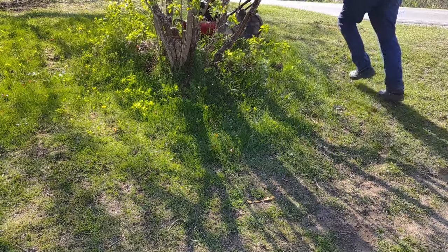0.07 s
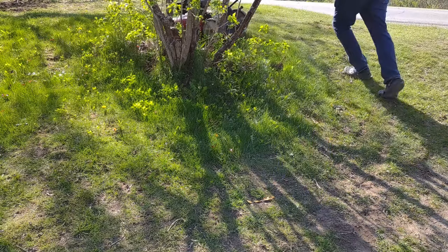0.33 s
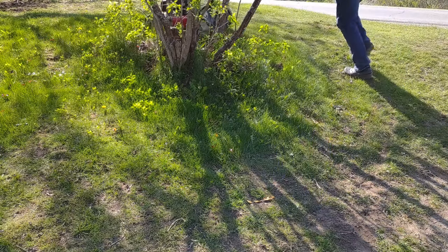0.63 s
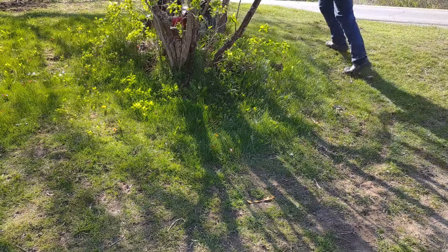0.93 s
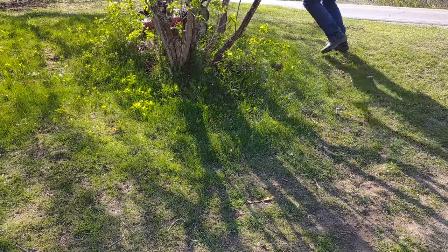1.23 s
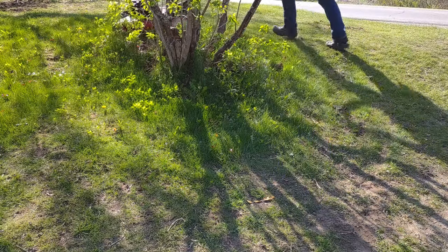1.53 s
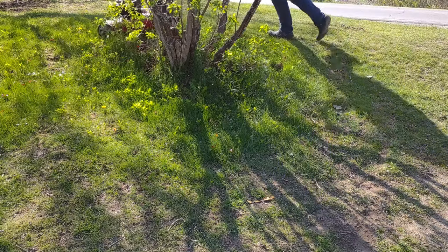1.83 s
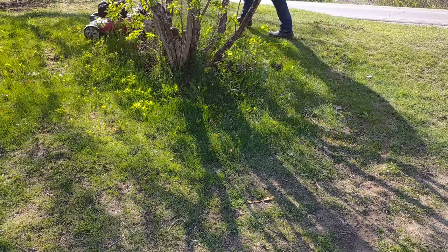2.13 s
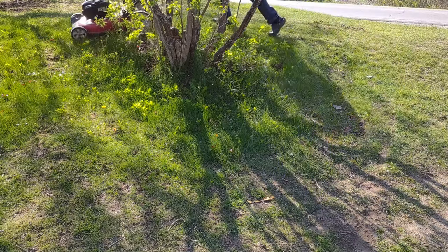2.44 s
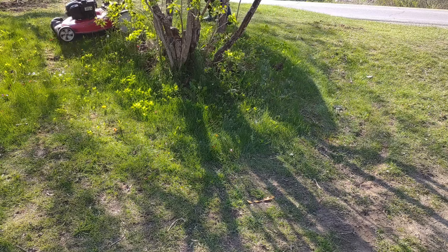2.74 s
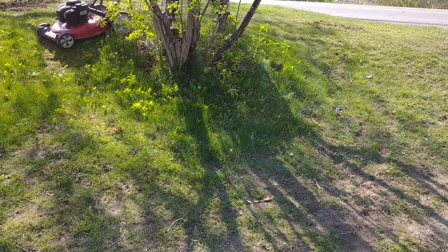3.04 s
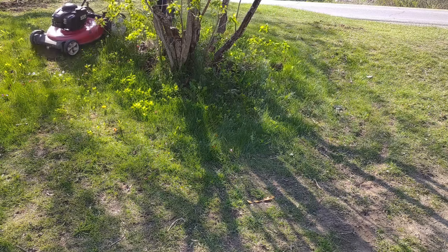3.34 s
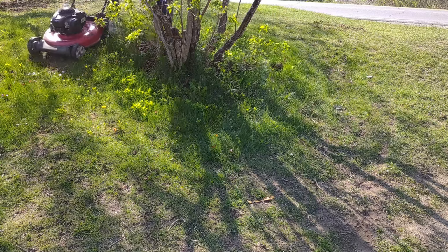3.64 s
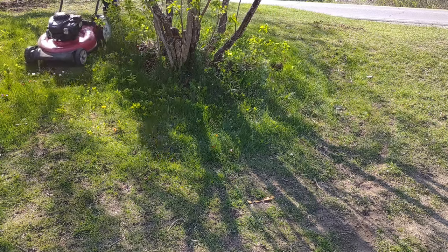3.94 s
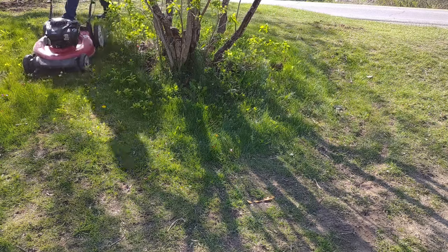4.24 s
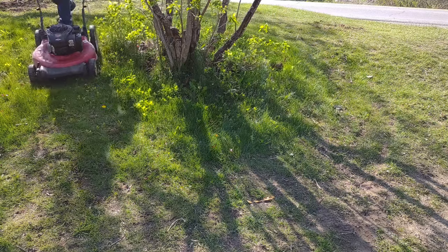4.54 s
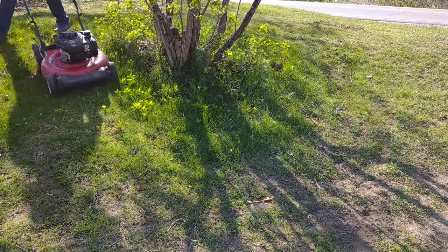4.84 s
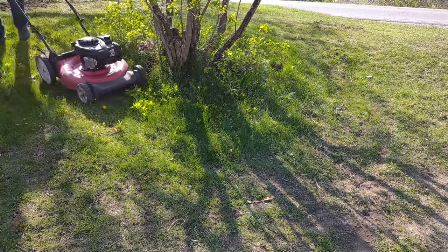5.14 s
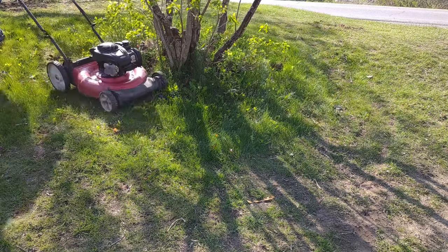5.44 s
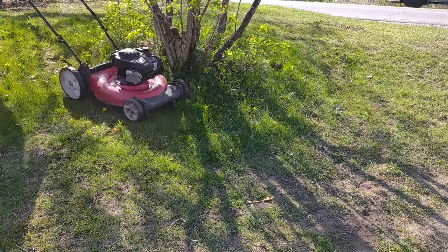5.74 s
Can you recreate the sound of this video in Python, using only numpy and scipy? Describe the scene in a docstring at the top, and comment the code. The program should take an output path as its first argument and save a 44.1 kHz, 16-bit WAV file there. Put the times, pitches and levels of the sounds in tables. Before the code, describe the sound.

A small petrol push mower runs without a break for about six seconds on a lawn, heard from a fixed spot a few metres away. Its pitch stays even: a low blade hum over a rapid, throbbing exhaust. For the first two seconds it is behind a bush and sounds muffled, moving from near the centre to slightly left. Faint ticks of twigs come around 1.7 to 2 seconds. From about 2.5 seconds the mower comes round the bush and gradually brightens, with sharper exhaust pops, light valve clatter and the hiss of cut grass. Small, brief twig crackles are scattered between 2.7 and 4.1 seconds. Around 4 seconds the deep hum thins, and by 5 seconds the mower faces the listener with a fuller, buzzing rush of air. A quick cluster of twig snaps comes near 5.3 seconds. A very faint, low outdoor background lies underneath.

```python
"""A muffled, pulsing drone comes from behind a bush: a four-stroke petrol mower, pushed over a lawn.
It brightens as it comes round the bush and turns its open side to the listener. The two-tipped blade
hums and churns the air under the deck, the exhaust pops once in two turns, valves clatter, and grass
and twigs crackle in the blade. Distance, the bush, its trunk and the turn set how much of each sound
arrives; interference with the ground echo colours the hiss."""
import sys
import numpy as np
from scipy import signal
from scipy.fft import rfft, irfft
from scipy.io import wavfile
from scipy.ndimage import map_coordinates

SR = 44100
rng = np.random.default_rng(int(sys.argv[2]) if len(sys.argv) > 2 else 0)


def pcm_store(signal):
    """Save signal as 16-bit PCM."""
    levels = np.round(np.clip(np.atleast_2d(signal), -1, 1) * 32767)
    wavfile.write(sys.argv[1], SR, levels.astype(np.int16).T)


N = 254898
TIME = np.arange(N) / SR
# the walk round the bush: time_s, distance_m, hidden_fraction
WALK_ROUND_BUSH = [(0, 4.2, 0.72), (.5, 5.4, 0.85), (1.6, 6.33, 0.9), (2.5, 5.2, 0.68), (2.75, 3.8, 0.57),
                   (3.25, 4.1, 0.32), (3.9, 4.06, 0.14), (4.8, 3.98, 0), (5.78, 3.57, 0.07)]


def gain_of(db):
    """Decibels to amplitude: 20 dB is a factor of ten."""
    return 10 ** (np.asarray(db) / 20)


def unit_rms(x):
    """Normalisation to unit mean power."""
    return x / np.sqrt(np.mean(x ** 2) + 1e-20)


def follow(table):
    """Linear interpolation of each column over time, sample by sample."""
    time_s, *columns = np.transpose(table)
    return [np.interp(TIME, time_s, column) for column in columns]


def colour(x, spectrum):
    """Minimum-phase filtering to a given spectral shape; the result has unit rms."""
    hz, db = np.transpose(spectrum)
    bins = abs(np.fft.fftfreq(8192, 1 / SR))
    log_gain = np.log(gain_of(np.interp(np.log(bins + 1), np.log(hz), db)))
    response = np.exp(np.conj(signal.hilbert(log_gain)))
    taps = np.fft.ifft(response).real[:len(bins) // 2]
    return unit_rms(signal.oaconvolve(np.atleast_2d(x), taps[None], axes=1)[:, :N])


def wander(hz):
    """Random fluctuation of unit rms, band-limited to about hz."""
    bins = np.fft.rfftfreq(2 ** 18, 1 / SR)
    white = rfft(rng.standard_normal(2 ** 18))
    return unit_rms(irfft(white * np.exp(-(bins / hz) ** 2))[:N])


def air(apart):
    """Partial coherence: white noise whose two channels differ more as apart rises to 1."""
    common, side = rng.standard_normal((2, N))
    return unit_rms(np.array([common + apart * side, common - apart * side]))


def delayed(x, samples):
    """Propagation delay along a path of changing length."""
    return map_coordinates(x, [np.arange(N) - samples], order=5, mode="mirror")


def heard(db, bush_db=0, trunk_db=0, turned_db=0):
    """Spherical spreading from level db at 4 m, less bush and trunk losses, plus the turn's gain."""
    metres, hidden = follow(WALK_ROUND_BUSH)
    trunk_s, trunk_half_s, turn_s, turn_half_s = 0.73, 0.72, 4.74, 0.37
    behind_trunk = np.exp(-((TIME - trunk_s) / trunk_half_s) ** 2)
    turned = .5 + .5 * np.tanh((TIME - turn_s) / turn_half_s)
    return 4 / metres * gain_of(db - bush_db * hidden - trunk_db * behind_trunk + turned_db * turned)


def engine_cycles(start=-.24):
    """Phase is the integral of the firing rate; the exhaust opens at each whole number."""
    # the governor hunts a little as the load changes: time_s, firing_rate_hz
    speed = [(0.0, 28.437), (0.2, 27.856), (0.89, 28.868), (1.1, 28.049), (1.45, 28.123), (1.78, 28.621),
             (2.45, 28.426), (2.78, 29.107), (2.99, 28.688), (3.9, 28.705), (4.01, 29.063), (4.82, 28.797),
             (5.26, 28.805), (5.78, 28.632)]
    return start + np.cumsum(follow(speed)[0]) / SR


def blade_angle(cycles, lag=0.0695):
    """Blade-pass phase: two tips and two turns make four passes a cycle."""
    return 2 * np.pi * 4 * (cycles - lag)


def firings(cycles):
    """Impulse train: a unit click each time the exhaust valve opens."""
    return 1. * (np.diff(np.floor(cycles), prepend=np.floor(cycles[0])) > 0)


def firing_harmonics(cycles, table, waver_db=1.6, slip_rad=0.089):
    """Periodic firing gives a harmonic series, each partial a little unsteady in level and phase."""
    out = np.zeros(N)
    for harmonic, db in table:
        angle = 2 * np.pi * round(harmonic) * cycles + slip_rad * wander(3.9)
        out += gain_of(db + waver_db * wander(28)) * np.cos(angle)
    return np.sqrt(2) * out


def lawn_ambience(level_db=-49):
    """Stationary noise: a faint, low outdoor background."""
    # background spectrum: frequency_hz, relative_db
    spectrum = [(20, 5), (45, -13.5), (90, -20), (200, 7), (500, -9), (2000, -27), (16000, -66)]
    return gain_of(level_db) * colour(air(0.09), spectrum)


def twigs(level_db=-3.0, splinter_db=4, width_hz=3500, broadband=0.08):
    """Brittle fracture: each twig splinters in a bright noise burst that decays exponentially."""
    # twigs and stalks hit by the blade: start_s, relative_db, t60_s, pitch_hz
    strikes = [(.075, -46, 0.018, 7500), (1.718, -31, 0.016, 8400), (1.983, -35, 0.026, 7800),
               (2.009, -29.5, 0.033, 8000), (2.027, -32, .02, 9000), (2.651, -30, 0.1, 7540),
               (2.744, -27.5, 0.068, 6500), (2.97, -20.5, 0.023, 9900), (3.016, -27, 0.033, 12500),
               (3.407, -24, 0.039, 6000), (3.718, -22, .03, 6000), (4.1, -28, 0.031, 8000),
               (5.274, -19, 0.016, 9500), (5.282, -20, .03, 7700), (5.345, -24, 0.027, 8000),
               (5.353, -17, 0.069, 7450), (5.381, -20, 0.015, 7860)]
    # splintering spectrum: frequency_hz, relative_db
    spectrum = [(800, -6), (3000, -2), (5500, -5.5), (7500, -2), (10500, -3), (13000, -5), (16000, 0)]
    splinters = colour(air(0.55) * gain_of(splinter_db * wander(630)), spectrum)
    out = np.zeros((2, N))
    for start_s, db, t60_s, hz in strikes:
        start = round(start_s * SR)
        burst = splinters[:, start:start + SR // 10]
        length = burst.shape[1]
        ring = unit_rms(signal.lfilter(*signal.iirpeak(hz, hz / width_hz, SR), burst))
        decay = gain_of(level_db + db - 60 * TIME[:length] / t60_s)
        out[:, start:start + length] += decay * unit_rms(ring + broadband * burst)
    return out


def grass(cycles, snaps_per_s=1500, spread_db=4, fizz=1.27, surge_db=1.5, patchy_db=1.46):
    """Shot noise: countless stalks snap and clippings strike the deck, in clumps."""
    # cutting spectrum: frequency_hz, relative_db
    spectrum = [(1500, -18), (4000, -29.5), (5500, -13), (6100, -3.5), (8000, -4), (10400, -5),
                (11100, -8.5), (15500, -13)]
    # thick tufts that the blade bites into: centre_s, half_length_s, boost_db
    tufts = [(.22, 0.085, 3.5), (1.295, 0.3, 3.5), (1.755, 0.099, 6), (1.992, 0.067, 7.5), (2.683, .08, 0),
             (4.1, 0.14, 3), (5.72, 0.19, 3.5)]
    sizes = gain_of(spread_db * np.minimum(rng.exponential(1, N), 3.5))
    snaps = sizes * (rng.random(N) < snaps_per_s / SR) * np.sign(rng.standard_normal(N))
    snaps = snaps * (1 + .5 * rng.standard_normal((2, N)))  # unequal left and right
    cutting = unit_rms(snaps) + fizz * air(1.0)
    clumps = gain_of(surge_db * np.cos(2 * np.pi * (cycles + 0.17)) + patchy_db * wander(70))
    swell = gain_of(sum(db * np.exp(-((TIME - s) / half) ** 2) for s, half, db in tufts))
    gain = heard(db=-39, bush_db=5, trunk_db=19, turned_db=2.5)
    return gain * swell * colour(cutting * clumps, spectrum)


def valve_clatter(cycles, uneven_db=4.0, dull_db_per_octave=7):
    """Impact excitation: valves and piston knock, and the casing rings in its modes."""
    # knocks after each exhaust pop: start_cycles, decay_cycles, relative_db
    knocks = [(.78, 0.15, -6), (.92, 0.016, 3), (0.3, 0.36, -7), (0, 0.019, -10)]
    # modes of the engine casing: pitch_hz, bandwidth_hz, relative_db
    modes = [(2600, 260, 1), (4006, 120, 9), (5400, 200, 8), (5980, 95, 11.5), (7040, 170, -6),
             (7650, 110, 9), (10900, 220, -10)]
    impacts = sum(gain_of(db) * np.exp(-((cycles - at) % 1) / decay) for at, decay, db in knocks)
    rattle = unit_rms(impacts * gain_of(uneven_db * wander(40)) * air(0.32))
    tilt = dull_db_per_octave * follow(WALK_ROUND_BUSH)[1]  # low modes pass the leaves best
    ring = np.zeros((2, N))
    for hz, width_hz, db in modes:
        mode = signal.lfilter(*signal.iirpeak(hz, hz / width_hz, SR), rattle)
        ring += gain_of(db - tilt * np.log2(hz / 6000)) * mode
    return (unit_rms(ring) * heard(db=-40, bush_db=11.5, trunk_db=10.5, turned_db=-0.2)
            + rattle * heard(db=-52, bush_db=19, trunk_db=15))


def tip_hiss(cycles, surge_db=1.5, chop_db=1.0):
    """Aerodynamic noise: air hisses off the blade tips, modulated by engine cycle and blade pass."""
    # hiss spectrum: frequency_hz, relative_db
    spectrum = [(800, -19), (2500, -7), (3400, 5), (4300, 3.5), (5200, 2), (6200, -1), (7600, -0.5),
                (9000, -7.5), (16000, -41)]
    surge = surge_db * np.cos(2 * np.pi * (cycles + 0.083))
    pulse = gain_of(surge - chop_db * np.cos(blade_angle(cycles)))
    return colour(pulse * air(0.41), spectrum) * heard(db=-35.5, bush_db=11, trunk_db=13, turned_db=2)


def deck_judder(cycles, jitter_cycles=.003, t60_s=.6):
    """Impulse response: each firing shakes the steel deck into a dense ring that outlasts the cycle."""
    t = TIME[:SR // 4]
    ring = rng.standard_normal(len(t)) * gain_of(-60 * t / t60_s)
    clicks = firings(cycles + jitter_cycles * wander(18))
    return unit_rms(signal.oaconvolve(clicks, ring)[:N])


def deck_turbulence(cycles, chop_db=1.0, surge_db=0.5, flutter_db=1.04, bend_hz=620):
    """Amplitude modulation: turbulence under the deck swells with each blade pass and power stroke."""
    # roar under the deck: frequency_hz, relative_db
    roar_spectrum = [(30, -17.5), (100, -23.5), (200, -3.5), (350, -6.5), (550, 1), (810, 2), (930, -20.5),
                     (1400, -9.5), (1800, -19), (3000, -31.5), (8000, -93.5)]
    # rush out of the open side: frequency_hz, relative_db
    rush_spectrum = [(60, -24), (250, 9), (600, -3.5), (950, 5.5), (1400, 2), (1900, -2), (2250, -4),
                     (2600, -3.5), (2950, -9.5), (3400, -19.5), (6000, -17), (16000, -51)]
    chop = chop_db * np.cos(blade_angle(cycles))
    pulse = gain_of(chop + surge_db * np.cos(2 * np.pi * cycles) + flutter_db * wander(30))
    judder = deck_judder(cycles)
    roar = colour(pulse * (air(0.32) + .5 * judder), roar_spectrum)
    growl = signal.filtfilt(*signal.butter(4, bend_hz, fs=SR), roar)  # lows diffract round the bush
    rush = colour(pulse * (air(0.38) + .55 * judder), rush_spectrum)
    return (growl * heard(db=-29, bush_db=12, trunk_db=9, turned_db=-4)
            + (roar - growl) * heard(db=-27, bush_db=30.5, trunk_db=-9.5, turned_db=-1)
            + rush * heard(db=-37.5, bush_db=3.5, trunk_db=0.5, turned_db=9.5))


def exhaust_pops(cycles, rise_s=.00036, outlet_hz=165, trap_hz=201, trap_width_hz=30):
    """Pulse radiation: each firing throws a spike out of the muffler, whose chamber traps one band."""
    uneven_db, jitter_cycles = 1.0, .005
    t = np.arange(-SR // 40, SR // 40) / SR
    # a small outlet cannot radiate the lowest sounds, so the spike stands between shallow dips
    low_cut = signal.butter(4, outlet_hz, "high", fs=SR, output="sos")
    spike = signal.sosfiltfilt(low_cut, np.exp(-.5 * (t / rise_s) ** 2))
    clicks = firings(cycles + jitter_cycles * wander(12)) * gain_of(uneven_db * wander(27))
    pops = signal.oaconvolve(clicks, spike / spike.max(), "same")
    trap = signal.iirnotch(trap_hz, trap_hz / trap_width_hz, SR)
    return heard(db=-13.5, bush_db=23, turned_db=-2) * signal.filtfilt(*trap, pops)


def exhaust(cycles, puff_db=2):
    """Periodic forcing: at each firing the muffler pops, drones and puffs gas, and the engine rocks."""
    # gas leaving the muffler: frequency_hz, relative_db
    gas_spectrum = [(25, -26), (80, 10), (145, 7.5), (270, 4), (380, 4.5), (600, -6.5), (1600, -31),
                    (4000, -68)]
    # the muffler's drone: firing_harmonic, relative_db
    drone_partials = [(5, -15), (6, -6.5), (9, -13), (10, -8), (13, -21), (14, -12)]
    # the shaft's shake: firing_harmonic, relative_db
    shake_partials = [(2, -4.5), (3, -0.5)]
    # the engine's steady low throb: firing_harmonic, level_db
    throb_partials = [(5, -39.5), (6, -49)]
    puffs = air(0.092) * gain_of(puff_db * np.cos(2 * np.pi * (cycles - .1)))
    gas = colour(puffs, gas_spectrum) * heard(db=-44, bush_db=-1, turned_db=-2)
    drone = firing_harmonics(cycles, drone_partials) * heard(db=-43, bush_db=5.5, turned_db=-12)
    shake = firing_harmonics(cycles, shake_partials) * heard(db=-47, bush_db=-0.5, turned_db=-4)
    return exhaust_pops(cycles) + gas + drone + shake + firing_harmonics(cycles, throb_partials)


def blade_hum(cycles, waver_rad=1.0, unsteady=0.52):
    """Rotor noise: the blade's periodic pressure wave; uneven grass and eddies make overtones waver."""
    # blade-pass tone and its octave as beamed at the listener: time_s, tone_db, octave_db
    beam = [(0.0, -23, -37.5), (1.01, -22, -37), (1.13, -22, -42), (2.62, -21.5, -40.5), (2.7, -23, -51),
            (2.85, -23, -38), (3.62, -30.5, -28.5), (4.07, -49, -29), (4.68, -35.5, -31), (4.83, -33, -58),
            (4.88, -31.5, -45), (5.22, -27.5, -41.5), (5.44, -28, -31.5), (5.78, -27.5, -34)]
    # low overtones: blade_pass_harmonic, relative_db
    buzz_partials = [(3, 1), (4, 1.5), (5, -4.5)]
    # high overtones: blade_pass_harmonic, relative_db
    whine_partials = [(6, -1.5), (7, -20), (8, -14), (12, -15)]
    tone_db, octave_db = follow(beam)
    angle = blade_angle(cycles)
    out = gain_of(tone_db + 0.36) * np.cos(angle)
    out += gain_of(octave_db + 0.5) * np.cos(2 * angle + waver_rad * wander(2.4))
    out *= np.sqrt(2)  # rms to peak
    buzz = heard(db=-41.5, bush_db=3, trunk_db=10, turned_db=6)
    whine = heard(db=-45, bush_db=0.5, trunk_db=0.5, turned_db=6.5)
    for gain, partials in (buzz, buzz_partials), (whine, whine_partials):
        for harmonic, db in partials:
            phasor = np.exp(2j * np.pi * rng.random())
            drift = unsteady * (wander(3.9) + 1j * wander(2.8)) / np.sqrt(2)
            overtone = ((phasor + drift) * np.exp(1j * round(harmonic) * angle)).real
            out += gain * gain_of(db) * unit_rms(overtone)
    return out


def ground_echo(direct, notch_hz, strength, turf_hz=11000):
    """Comb filtering: the direct sound interferes with its reflection, whose top the turf absorbs."""
    bounce = np.array([delayed(side, SR / (2 * notch_hz)) for side in direct])
    bounce = signal.filtfilt(*signal.butter(2, turf_hz, fs=SR), bounce)
    return (direct + strength * bounce) / np.sqrt(1 + strength ** 2)


def from_the_left(pair, lead_samples, shadow=0.39, shadow_hz=7000):
    """Time and level differences: the near side hears first and brighter, the far side is shadowed."""
    left, right = pair
    highs = signal.filtfilt(*signal.butter(2, shadow_hz, "high", fs=SR), pair)
    shade = shadow * lead_samples / lead_samples.max() / 2
    return np.array([left + shade * highs[0], delayed(right - shade * highs[1], lead_samples)])


def scene():
    """Superposition: the mower's sources add, arrive from the left and join the background."""
    # path to the listener: time_s, first_notch_hz, echo_ratio, left_lead_samples
    path = [(0, 4770, 0.13, 0.73), (.7, 4860, 0.56, 2.3), (1.3, 4840, 0.47, 3.9), (2, 4000, 0.64, 5.5),
            (2.5, 3480, 0.57, 6.4), (2.9, 2730, 0.32, 7.5), (4, 2620, 0.23, 8.36), (4.7, 2750, .18, 7.56),
            (5.2, 2970, 0.1, 6.5), (5.78, 3180, .04, 5.1)]
    notch_hz, echo, lead_samples = follow(path)
    cycles = engine_cycles()
    treble = valve_clatter(cycles) + tip_hiss(cycles) + grass(cycles)
    treble = ground_echo(treble, notch_hz, echo)
    mower = blade_hum(cycles) + exhaust(cycles) + deck_turbulence(cycles) + treble + twigs()
    return from_the_left(mower, lead_samples) + lawn_ambience()


def record(dry):
    """Band limiting: a steep low-pass removes the highest treble."""
    edge_hz = 15900
    taps = signal.firwin(511, edge_hz, window=("kaiser", 9), fs=SR)
    return signal.oaconvolve(dry, taps[None], "same")


dry = scene()
out = record(dry)
pcm_store(out)
```